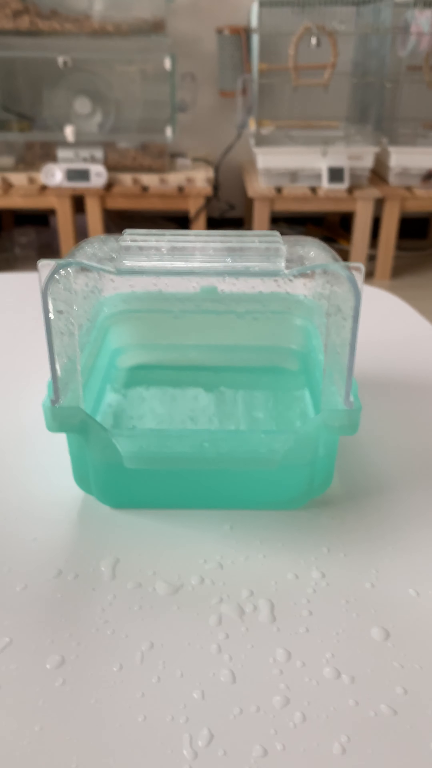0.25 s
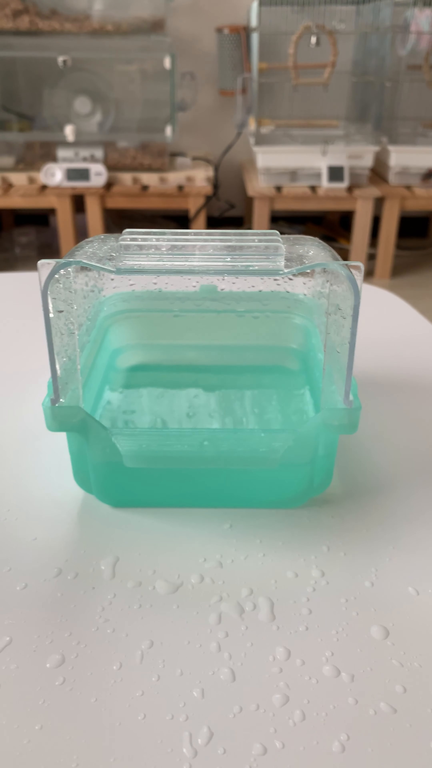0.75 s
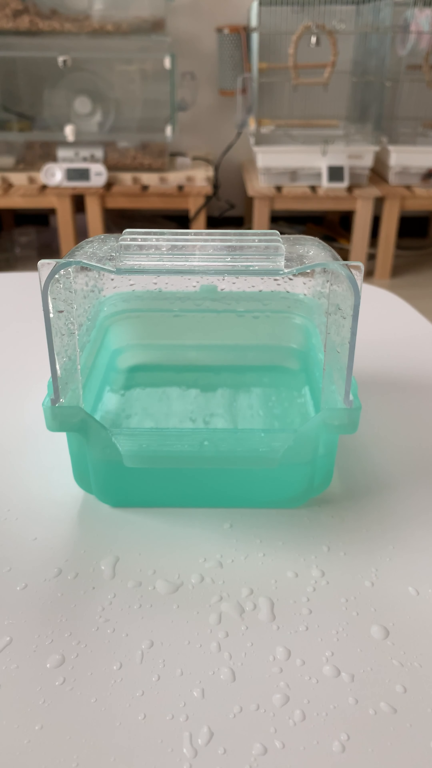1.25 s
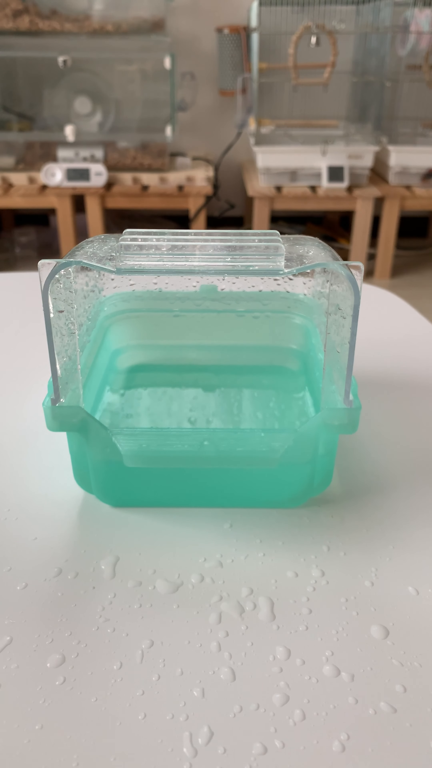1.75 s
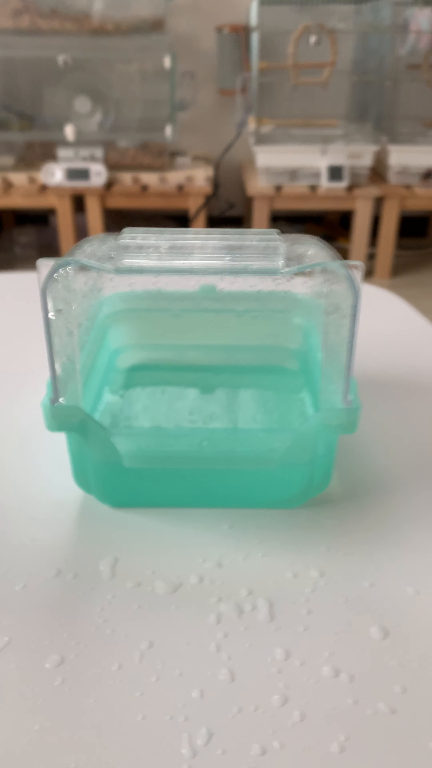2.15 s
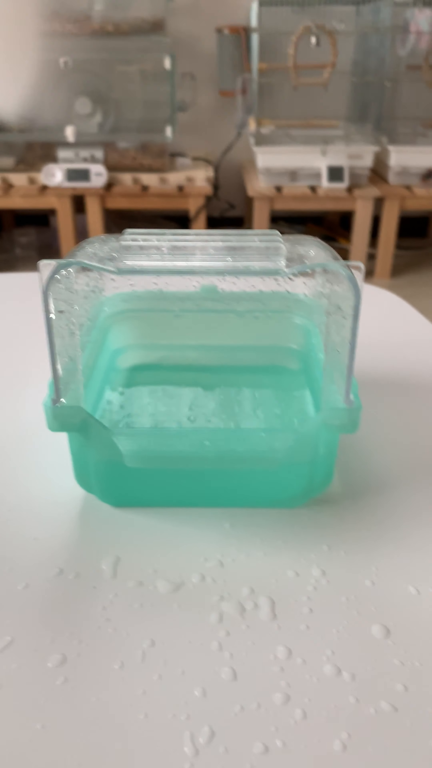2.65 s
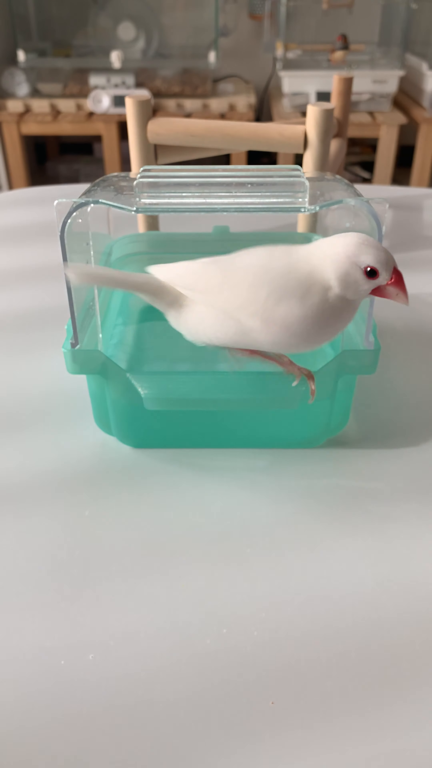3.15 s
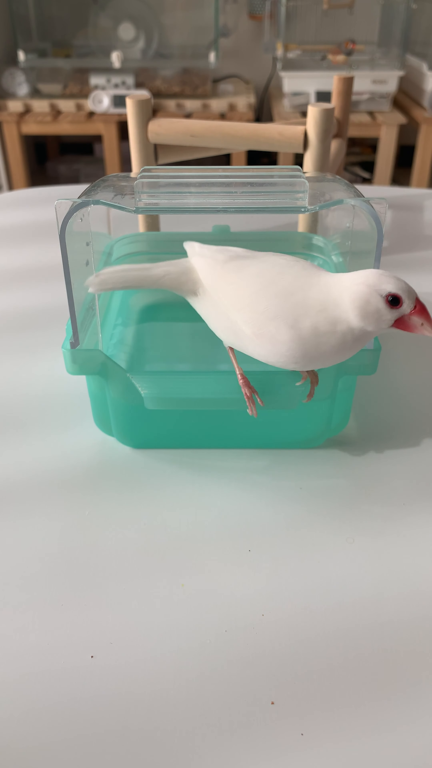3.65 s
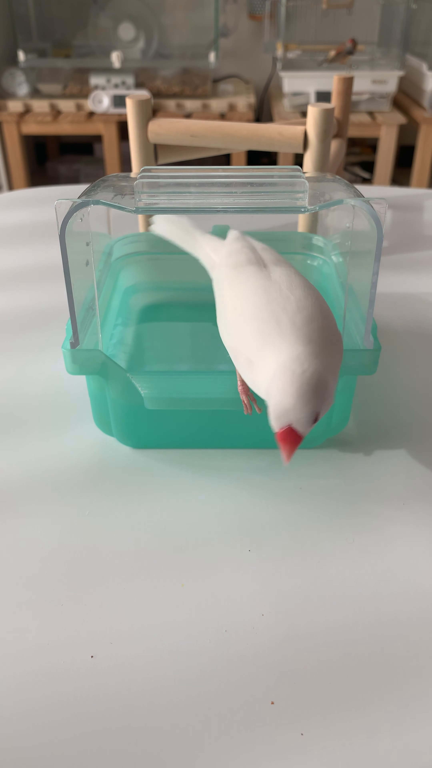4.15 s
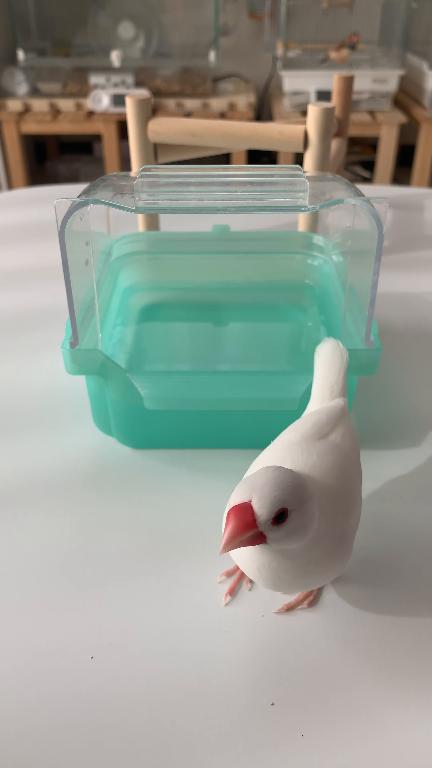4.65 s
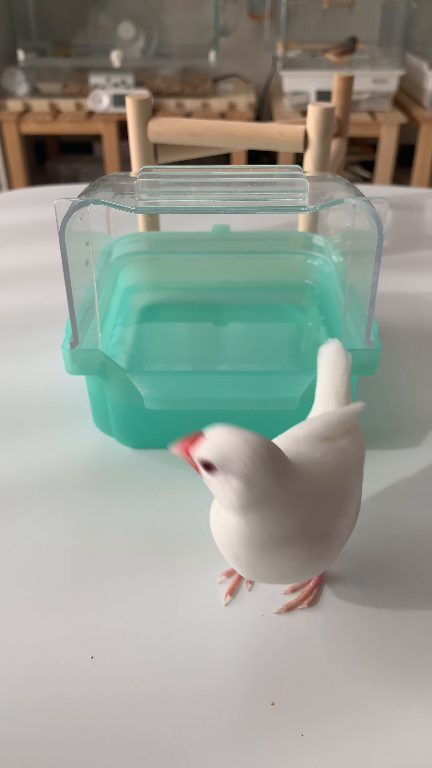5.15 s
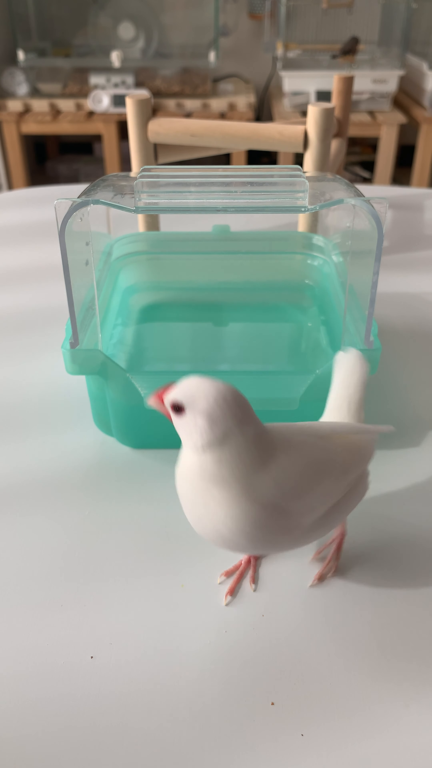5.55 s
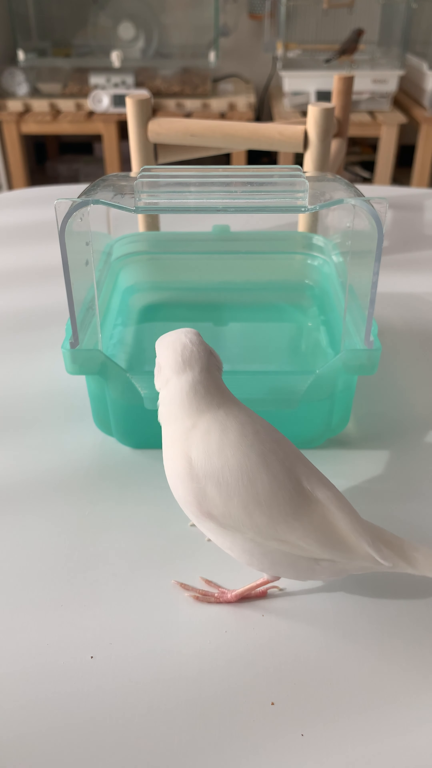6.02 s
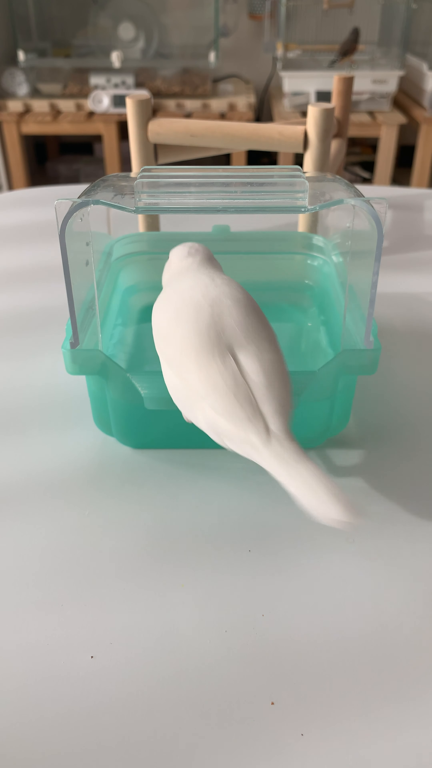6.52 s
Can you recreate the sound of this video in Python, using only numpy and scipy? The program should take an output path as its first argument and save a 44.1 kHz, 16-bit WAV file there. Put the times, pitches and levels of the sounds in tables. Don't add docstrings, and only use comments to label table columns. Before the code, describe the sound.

Soft wing flutters, sharp claw cracks and hollow plastic knocks up close, then a quieter room where a far finch sings hoarsely.

```python
import sys
import numpy as np
from scipy import signal
from scipy.fft import rfft, irfft, next_fast_len
from scipy.io import wavfile
from scipy.ndimage import uniform_filter1d

SR = 44100
rng = np.random.default_rng(int(sys.argv[2]) if len(sys.argv) > 2 else 0)


def output_pcm(signal):
    pcm = np.clip(np.atleast_2d(signal).T, -1, 1) * 32767
    wavfile.write(sys.argv[1], SR, np.round(pcm).astype(np.int16))


def invert_db(x):
    u = np.asarray(x, float) / 20
    return 10 ** u


N = 298998
CHANGE_S = 3.049


def evened(x):
    return x / np.sqrt(np.mean(x ** 2) + 1e-20)


def read(points, hz):
    f, value = np.transpose(points)
    return np.interp(np.log(hz + 1), np.log(f + 1), value)


def add(mix, s, sound):
    part = mix[max(round(s * SR), 0):][:len(sound)]
    part += sound[:len(part)]


def coloured(x, spectrum):
    n = next_fast_len(x.shape[-1])
    gain = invert_db(read(spectrum, np.fft.rfftfreq(n, 1 / SR)))
    return irfft(rfft(x, n) * gain, n)[..., :x.shape[-1]]


def swells(peak_s, peak_db, rise_db_s, fall_db_s):
    since = np.arange(0, N + 64, 64)[:, None] / SR - peak_s
    level_db = (peak_db + np.minimum(rise_db_s * since, -fall_db_s * since)).max(axis=1)
    return invert_db(np.interp(np.arange(N) / 64, np.arange(len(level_db)), level_db))


def diffuse(spectrum, likeness, patchy_db):
    frames, hz = N // 256 + 5, np.fft.rfftfreq(1024, 1 / SR)
    a, b, c, d, patches = rng.standard_normal((frames, 513, 5)).T
    patches = uniform_filter1d(patches, size=14, axis=0)
    patches = evened(uniform_filter1d(patches, size=16, axis=1))
    same = np.clip(read(likeness, hz), 0, 1)[:, None]
    left = a + 1j * b
    right = same * left + np.sqrt(1 - same ** 2) * (c + 1j * d)
    z = np.array([left, right]) * invert_db(patchy_db * patches)
    noise = signal.istft(z, nperseg=1024, noverlap=768)[1][:, :N]
    return evened(coloured(noise, spectrum))


# f/Hz, density/dB per Hz
TONE_BEFORE = [(30, -17), (60, -4.5), (100, -1), (170, -3.5), (260, 0), (390, -1.5), (520, -9), (800, -12),
               (1400, -12), (2200, -17.5), (3200, -26), (5000, -38.5), (9000, -41.5), (15500, -38)]
TONE_AFTER = [(30, -26), (60, -1.5), (100, 4), (170, -22), (260, -3.5), (390, -0.5), (520, -5.5),
              (800, -9.5), (1400, -11.5), (2200, -21), (3200, -33), (5000, -34), (9000, -38), (15500, -36)]
# f/Hz, likeness/0..1
ROOM_LIKENESS = [(60, 1), (260, 0.92), (400, 1), (560, 0.73), (800, 0.021), (3000, 0.22)]
# t/s, level/dB
NEARING = [(.6, -0.5), (1.4, -0.5), (1.7, 2), (2.0, 1.5), (2.8, -0.5)]
# f/Hz, width/Hz, level/dB
HUM = [
    (164.4, 13.6, -61.5),
    (258.3, 18, -63),
    (297.3, 21, -67.5),
    (387.4, 10, -61),
]
# t/s (peak), level/dB
STIRS = [
    (3.3, -75),
    (4.621, -64.5),
    (4.87, -66),
    (5.3, -84),
]
# f/Hz, density/dB per Hz
STIR_COLOUR = [(600, -30), (1200, -3), (2200, 0), (3200, -5), (3700, -18), (8000, -40)]


def room_tone():
    t = np.arange(N) / SR
    drone = np.zeros(N)
    for hz, width_hz, db in HUM:
        pole = np.exp(-np.pi * width_hz / SR)
        noise = rng.standard_normal(N) + 1j * rng.standard_normal(N)
        wobble = signal.lfilter([1], [1, -pole], noise)
        drone += invert_db(db) * evened((wobble * np.exp(2j * np.pi * hz * t)).real)
    before_db = -53 + np.interp(t, *np.transpose(NEARING))
    before = invert_db(before_db) * diffuse(TONE_BEFORE, ROOM_LIKENESS, patchy_db=1.5)
    after = invert_db(-58) * diffuse(TONE_AFTER, ROOM_LIKENESS, patchy_db=1.0) + drone
    stir = swells(*np.transpose(STIRS), rise_db_s=106, fall_db_s=116)
    after += stir * diffuse(STIR_COLOUR, ROOM_LIKENESS, patchy_db=1.6)
    return np.where(t < CHANGE_S, before, after)


# f/Hz, level/dB
THROAT = [(500, -39), (1100, 2), (2000, -6.5), (3500, -2.5), (5000, -5.5), (6200, -6.5), (7200, -17.5),
          (9000, -13.5), (11800, -18), (12800, -55.5)]


def syllable(length, hz, glide, db, beak_hz, rough, jitter, beak_width, count, lean=0.81, half=0.):
    n = round(length * SR)
    a, b = rng.standard_normal((2, n))
    wander = evened(uniform_filter1d(a, size=80))
    pitch_hz = hz * glide ** np.linspace(0, 1, n) * (1 + jitter * wander)
    turns = np.cumsum(pitch_hz) / SR
    tone = sum(np.cos(2 * np.pi * k * turns) for k in range(1, count + 1))
    tone = tone * (1 + half * np.cos(np.pi * turns))
    breath = b * (0.74 + np.exp(-(turns % 1) / 0.33))
    drive = (1 - rough) * evened(tone) + rough * breath
    f = np.fft.rfftfreq(n, 1 / SR)
    beak_db = -14.0 * (1 - np.exp(-(np.log((f + 1) / beak_hz) / beak_width) ** 2))
    voice = irfft(rfft(coloured(drive, THROAT)) * invert_db(beak_db), n)
    voice *= invert_db(3.5 * evened(uniform_filter1d(a[::-1], size=250)))
    envelope = np.sin(np.pi * np.linspace(0, 1, n) ** lean) ** 1.3
    return invert_db(db) * evened(voice) * envelope


# t/s, length/s, f/Hz (pitch), level/dB, f/Hz (beak)
STACKS = [
    (5.211, 0.043, 534, -64.5, 2410),
    (5.512, 0.055, 557, -50.5, 3060),
    (5.653, 0.052, 577, -49.5, 3330),
    (5.766, 0.051, 566, -51, 3000),
    (5.861, 0.071, 549, -45, 3930),
    (6.007, .04, 595.5, -42.5, 3400),
    (6.329, 0.051, 578, -45.5, 4170),
    (6.442, 0.069, 593, -44.5, 3900),
]
# t/s, length/s, f/Hz (pitch), glide/ratio, level/dB, f/Hz (beak)
CALL = (5.212, .065, 530, 1.04, -57, 2500)
# t/s, length/s, f/Hz (pitch), level/dB
DRAWLS = [
    (6.108, .15, 1141, -40.5),
    (6.562, 0.11, 1165, -39),
]
# t/s, length/s, f/Hz, glide/ratio,
# level/dB
OVERTONES = [(6.125, 0.1, 6500, .84, -46.5), (6.155, .1, 4150, 0.99, -48), (6.15, 0.12, 3600, .84, -47),
             (6.15, 0.12, 2400, .8, -54.5), (6.575, 0.098, 6300, .86, -42.5), (9.7, 0.092, 5300, 0.93, -42),
             (6.585, .12, 3600, .83, -46), (6.61, .09, 2150, .9, -52), (5.875, 0.058, 3400, 0.93, -49),
             (5.97, .03, 2100, .9, -57.5), (6.545, 0.022, 6500, 0.89, -53), (6.12, .14, 1200, .88, -51),
             (6.57, .11, 1200, .88, -51)]
# t/s, length/s, f/Hz, glide/ratio, level/dB
WHISTLES = [
    (5.945, 0.019, 5560, 0.73, -33.5),
    (5.958, 0.025, 4074, 0.99, -35),
    (6.069, 0.045, 6530, 1, -52.5),
    (6.391, 0.04, 6266, 0.81, -38.5),
    (6.4, 0.024, 4470, 0.94, -47),
    (6.406, 0.026, 4110, 0.84, -37),
    (6.52, 0.029, 6380, 0.96, -47.5),
]
# t/s, level/dB (peak), f/Hz
THROBS = [
    (5.9585, -25, 5200),
    (5.966, -37, 3930),
    (5.9724, -29, 3620),
    (5.9809, -29, 3650),
    (6.4043, -44, 6070),
    (6.4305, -41, 3730),
]


def finch():
    out = np.zeros(N)
    for s, length, hz, db, beak_hz in STACKS:
        add(out, s, syllable(length, hz, 1, db, beak_hz,
                             rough=0.71, jitter=0.03, beak_width=0.6, count=22))
    add(out, CALL[0], syllable(*CALL[1:], rough=.5, jitter=.025, beak_width=.4, count=8))
    for s, length, hz, db in DRAWLS:
        add(out, s, syllable(length, hz, .86, db, 4300, rough=.6, jitter=.04,
                             beak_width=.6, count=11, lean=1.2, half=.4))
    for s, length, hz, glide, db in OVERTONES:
        add(out, s, syllable(length, hz, glide, db, hz * np.sqrt(glide),
                             rough=.4, jitter=.035, beak_width=.2, count=1))
    for s, length, hz, glide, db in WHISTLES:
        add(out, s, syllable(length, hz, glide, db, hz * np.sqrt(glide),
                             rough=.45, jitter=.055, beak_width=.3, count=1))
    throb_s = 0.0031
    t = np.arange(0, throb_s, 1 / SR)
    for s, db, hz in THROBS:
        add(out, s, invert_db(db) * np.sin(np.pi * t / throb_s) ** 2 * np.sin(2 * np.pi * hz * t))
    return out


# f/Hz, t60/s
ROOM = [(200, 0.057), (1000, 0.32), (4000, 0.27), (10000, 0.18)]


def room(x, first):
    size = SR // 2
    taps = np.zeros((2, size))
    at = np.arange(first, size - 20, 20) + rng.integers(0, 20, (2, (size - 1 - first) // 20))
    np.put_along_axis(taps, at, rng.choice([-1., 1.], at.shape), 1)
    hz, t, z = signal.stft(taps, SR, nperseg=256)
    decay = invert_db(-60 * t / read(ROOM, hz)[:, None])
    tail = signal.istft(z * decay, SR, nperseg=256)[1]
    return signal.oaconvolve(x[None], tail / np.linalg.norm(tail[0]), axes=1)[:, :N]


# f/Hz, density/dB per Hz
BUFFET = [(20, -1), (32, -11), (55, -3.5), (100, -7), (200, -16.5), (400, -27.5), (800, -56), (1600, -52),
          (3000, -75.5)]
RUSTLE = [(300, 10), (800, 5), (1600, -1.5), (3500, -4), (5500, -2.5), (8000, -11.5), (12000, -9),
          (16000, -12)]
# f/Hz, likeness/0..1
AIR_LIKENESS = [(30, 0.67), (60, 0.9), (125, 0.99), (250, 0.94), (500, 0.74), (3000, 0.11)]
# t/s (peak), level/dB (air), level/dB (feathers)
GUSTS = [(0.0, -20, -48), (.105, -21, -50), (0.192, -16.5, -58.5), (.27, -38, -57), (0.36, -37.5, -63),
         (.508, -49, -70.5), (.786, -48.5, -76), (1.953, -37, -79), (2.02, -46.5, -74.5),
         (2.122, -27.5, -55.5), (2.2, -22.5, -51.5), (2.246, -21, -51), (2.3, -31, -59), (2.36, -37, -61),
         (2.421, -33, -59.5), (2.491, -27.5, -54.5), (2.551, -31, -60.5), (2.612, -17, -52),
         (2.683, -31, -69.5), (2.807, -35.5, -68), (2.87, -48.5, -69)]
# t/s (centre), level/dB (peak), f/Hz, cycles
BEATS = [(0.109, -11, 105, 0.63), (0.129, -12.5, 47.3, 1.03), (0.186, -12, 85, 1.),
         (0.198, -15.5, 70.3, 1.), (.214, -21, 90, .8), (0.244, -24, 93, 1.2), (0.353, -28, 59.3, 2.5),
         (0.508, -63, 59.5, 0.77), (0.798, -41, 71, 1.3), (2.268, -22.5, 56.6, 0.7),
         (2.2916, -15.5, 67, 2.16), (2.584, -13, 76, 0.77), (2.615, -10.5, 103, 1.05),
         (2.638, -14, 51.4, 0.5)]


def flutter():
    buffet = diffuse(BUFFET, AIR_LIKENESS, patchy_db=0.56)
    rustle = diffuse(RUSTLE, ROOM_LIKENESS, patchy_db=0.27)
    grain_db = 1.8 * evened(uniform_filter1d(rng.standard_normal(N), size=300))
    rustle = evened(rustle * invert_db(grain_db))
    s, air_db, feather_db = np.transpose(GUSTS)
    out = swells(s, air_db, rise_db_s=330, fall_db_s=323) * buffet
    out += swells(s, feather_db + 12.5, rise_db_s=307, fall_db_s=207) * rustle
    u = np.arange(-2000, 2000) / SR
    for s, db, hz, cycles in BEATS:
        envelope = invert_db(db) * np.exp(-(2 * u * hz / cycles) ** 2)
        packet = envelope * np.cos(2 * np.pi * hz * u * (1 - 4.6 * u))
        add(out.T, s - 2000 / SR, packet[:, None])
    return np.array([out[0], np.roll(out[1], 40)])


def ring(t, hz, t60, excess):
    turns = hz * (t + excess * 0.00057 * (1 - np.exp(-t / 0.00067)))
    return (1 - np.exp(-t / .0005)) * invert_db(-60 * t / t60) * np.sin(2 * np.pi * turns)


# f/Hz, density/dB per Hz
CLAW_HISS = [(300, -24), (1500, -11), (3000, -15), (4500, 6), (6500, -0.5), (9000, -2), (12000, 0),
             (15500, -3)]


def contacts(rows, sharpness, grit_db, snap, settle=0.24):
    t, out = np.arange(2048) / SR, np.zeros(N)
    first = snap * (np.arange(len(t)) == 24)
    for s, db, body_db, hz, length in rows:
        a, b, c = rng.standard_normal((3, len(t)))
        u = np.clip(t / max(length, .001), 0, 1)
        shape = np.sin(np.pi * u ** 0.61) ** 0.91
        shape += settle * (1 - np.exp(-t / 0.002)) * np.exp(-t / 0.0081)
        shape *= invert_db(grit_db * evened(uniform_filter1d(c, size=40)))
        hiss = evened(coloured(b + first, CLAW_HISS)) * shape
        peak = signal.iirpeak(hz, sharpness, SR)
        body = signal.lfilter(*peak, (a + first) * shape)
        body = signal.lfilter(*peak, body)
        body *= invert_db(body_db) * np.std(hiss) / np.std(body)
        add(out, s - .0006, invert_db(db - 12.0) * (hiss + body) / np.sqrt(1 + invert_db(2 * body_db)))
    return out


# t/s, level/dB (peak), length/s
SCRATCHES = [(0.098, -20.5, 0.0028), (0.209, -34, 0.0039), (0.375, -33, 0.0054), (0.504, -36, 0.0044),
             (2.572, -34, 0.015), (2.813, -37, 0.0052), (2.815, -26.5, 0.0042), (3.037, -38, 0.0081),
             (3.103, -49, 0.016), (3.127, -35, 0.0095), (3.144, -30.5, 0.0092), (3.1621, -25, 0.0038),
             (3.163, -25.5, 0.008), (3.169, -23.5, 0.0067), (3.563, -54, 0.0076), (3.677, -58.5, 0.011),
             (4.133, -43.5, 0.0063), (4.223, -31, 0.0055), (4.291, -32.5, 0.008), (4.303, -37.5, 0.025),
             (5.61, -38.5, 0.011)]
# t/s, level/dB (peak), f/Hz (body), length/s
GRIPS = [(0.471, -41, 1570, 0.0046), (0.772, -38, 1000, 0.0046), (0.7736, -40, 1030, 0.0069),
         (1.974, -36, 3200, 0.0038), (1.971, -40, 3200, 0.0035), (.01, -38, 3200, 0.044),
         (2.184, -45, 2500, 0.01), (2.214, -52, 2800, 0.0082), (2.255, -46, 2000, 0.023),
         (2.47, -43, 3000, 0.018), (0.14, -38, 2500, .012), (2.092, -48, 1570, 0.014),
         (2.116, -30.5, 2120, 0.0047), (2.24, -35.5, 2000, 0.0083), (2.657, -39.5, 1600, 0.033),
         (2.732, -49.5, 1280, 0.0058), (2.787, -42, 2800, 0.0068), (3.003, -43, 1390, 0.003),
         (3.186, -44.5, 1640, 0.057), (4.217, -36.5, 1780, 0.0077), (5.622, -48, 1110, 0.021),
         (5.644, -36, 3850, 0.01)]
# t/s, level/dB (peak), f/Hz (body)
TICKS = [(.0045, -34, 3000), (0.0212, -26, 5000), (0.029, -36, 3000), (0.063, -39, 3000),
         (.0675, -35, 2800), (.109, -35, 5500), (.12, -39, 6000), (.125, -39, 3200), (.1275, -38, 3500),
         (.1487, -29, 2500), (0.1511, -27, 2680), (0.1542, -21.5, 2830), (0.1575, -29, 2500),
         (.183, -53, 7000), (0.2065, -31, 5860), (.2511, -44.5, 6500), (.2555, -32, 5500),
         (0.2623, -29.5, 6400), (.2695, -48, 6500), (.288, -44, 6500), (0.3506, -49, 6500),
         (0.3675, -50, 7000), (0.372, -39, 4000), (0.501, -39, 4500), (0.504, -32.5, 5830),
         (0.513, -36, 3600), (3.192, -33, 9000), (2.184, -55, 6500), (2.242, -44, 3000),
         (2.434, -41.5, 7000), (2.469, -38, 6500), (2.4978, -41, 6000), (2.5043, -29, 6100),
         (2.5592, -56, 6500), (2.576, -44, 6500), (2.5823, -44, 6500), (2.6035, -51, 6500),
         (2.618, -36.5, 6500), (2.621, -45, 6500), (2.631, -28, 6500), (2.635, -28, 6000),
         (2.639, -32.5, 6030), (2.653, -39.5, 2500), (2.672, -38.5, 2480), (2.735, -54.5, 6000),
         (2.7878, -37.5, 5950), (2.8686, -73, 6000), (4.2172, -29, 6540), (1.9745, -35, 5730)]
# t/s, level/dB (peak)
DRIPS = [(0.5887, -56), (0.879, -52), (0.887, -56), (1.0091, -56), (1.129, -55), (1.142, -56), (1.249, -47),
         (1.269, -43), (1.288, -45), (1.388, -57), (1.414, -54)]
# t/s, level/dB (peak), level/dB (body re hiss), f/Hz (body), length/s
CRACKS = [(.7672, -39, 21, 2380, 0.0011), (.7916, -26.5, 16, 3240, 0.0024), (2.175, -32, 21, 1790, 0.0024),
          (2.4268, -17, 9, 2930, 0.0036), (2.803, -25, 40, 1280, 0.0044), (2.8078, -21, 20, 2500, 0.0011),
          (2.8095, -14, 8.1, 2300, 0.0016), (2.8615, -30, 2.9, 1860, 0.00095),
          (2.8645, -21.5, 22, 1870, 0.0009), (2.8686, -20, 18, 2220, 0.00147),
          (3.1715, -29, 9.8, 1940, 0.01), (3.1945, -31, 7.9, 2070, 0.0043), (4.2917, -34, 9, 5500, 0.00092),
          (4.309, -33.5, 6, 5000, 0.0011)]
# t/s, level/dB (peak), f/Hz (body), length/s
SCUFFS = [(0.092, -26, 740, 0.01), (2.427, -22, 322, 0.0087), (2.598, -29, 320, 0.024),
          (2.861, -36, 387, 0.013), (3.126, -38.5, 493, 0.023), (3.147, -33, 540, 0.024),
          (3.16, -36.5, 660, 0.048), (3.172, -44, 730, 0.03), (3.174, -34.5, 322, 0.043),
          (3.192, -48, 680, 0.01), (3.199, -45, 690, 0.041), (4.126, -42, 384, 0.047),
          (4.209, -40, 435, 0.07)]
# t/s, level/dB (peak), f/Hz, t60/s, starting
KNOCKS = [(.0965, -28, 780, 0.038, 0.23), (.175, -36, 920, 0.023, 1), (.1778, -17.5, 224, 0.024, 4),
          (4.126, -42, 390, .04, .1), (4.1375, -40.5, 374, 0.054, .1), (4.2175, -36, 800, .015, .8),
          (3.174, -49, 1820, 0.044, .1), (0.5055, -25, 253, 0.015, 1.35), (0.794, -24, 139, 0.0055, 1.4),
          (2.1755, -21, 465, 0.021, 3.7), (2.422, -35, 805, 0.072, 0.041), (2.725, -44, 734, 0.072, 0.09),
          (3.197, -31, 716, 0.039, 0.14), (6.484, -39.5, 650, 0.022, .1), (6.513, -29, 722, 0.067, 0.022),
          (6.523, -24.5, 647, 0.0091, 0.033),
          (.7668, -21.5, 764, 0.0089, .2), (.7913, -18, 700, 0.012, 1.86),
            (2.8093, -12, 660, 0.019, 3.54), (2.8135, -25, 200, 0.0095, 0.42),
            (2.8108, -20, 417, 0.011, 0.83), (2.4272, -26, 2000, 0.012, .2),
            (2.8094, -21, 2100, 0.0049, 0.45), (2.8605, -28, 1100, 0.013, .5),
            (2.8625, -25, 2050, 0.011, 0.24), (2.8635, -22, 784, 0.011, .3),
            (2.8684, -27, 694, 0.011, 1.35)]
# t/s, level/dB (peak), f/Hz, t60/s
DROPS = [(.061, -41, 1070, .02), (.0765, -39, 1990, .02), (.0865, -37.5, 2040, .04),
         (.108, -34, 3570, 0.011), (.1295, -41, 3100, 0.016), (0.145, -31, 2960, .012),
         (0.2014, -41, 1400, 0.015), (0.2548, -38.5, 1300, 0.017), (0.261, -44, 1270, 0.017),
         (0.2676, -34, 1340, 0.014), (0.275, -39, 1460, 0.016), (.2812, -44, 5900, .015),
         (.289, -44, 4090, 0.02), (0.29, -42, 1470, 0.014), (.3348, -37, 2150, 0.0081),
         (.3568, -41.5, 2040, 0.022), (0.433, -51, 1570, 0.024), (1.9312, -52, 1350, 0.023),
         (2.151, -43, 1000, 0.028), (2.19, -52, 1620, 0.018)]


def claws():
    rubs = [(s, db, -13, 1250, length) for s, db, length in SCRATCHES]
    rubs += [(s, db, 6, hz, length) for s, db, hz, length in GRIPS]
    ticks = [(s, db, 3, hz, .0018) for s, db, hz in TICKS]
    drips = [(s, db + 4, 28, 3300, .0015) for s, db in DRIPS]
    scuffs = [(s, db, 17.5, hz, length) for s, db, hz, length in SCUFFS]
    out = contacts(rubs, sharpness=0.46, grit_db=6.0, snap=0.5)
    out += contacts(ticks, sharpness=1.0, grit_db=2.2, snap=7.6, settle=0.064)
    out += contacts(drips, sharpness=1.1, grit_db=2.5, snap=9.0, settle=.05)
    out += contacts(CRACKS, sharpness=.75, grit_db=1.5, snap=9.0)
    out += contacts(scuffs, sharpness=1.7, grit_db=5.8, snap=0.47)
    t = np.arange(4000) / SR
    for s, db, hz, t60, excess in [*KNOCKS, *[(*row, 0) for row in DROPS]]:
        add(out, s, invert_db(db + 2.5) * ring(t, hz, t60, excess))
    return out


# f/Hz, level/dB
SOFT_EDGE = [(15750, 0), (16000, -40)]


def alike(x):
    n = next_fast_len(N)
    hz = np.fft.rfftfreq(n, 1 / SR)
    left, right = rfft(x, n) * invert_db(read(SOFT_EDGE, hz))
    mono = 1 / (1 + (3700 / (hz + 1)) ** 10)
    return irfft(np.array([left, mono * left + (1 - mono) * right]), n)[:, :N]


# f/Hz, level/dB
SCATTER_EDGE = [(6000, 0), (7500, -25)]


def scene():
    near, far = claws(), finch()
    tail = room(far, first=100)
    song = invert_db(-0.5) * far + invert_db(-1.5) * tail
    bounce = coloured(near, [(1200, -30), (3000, 0)])
    bounce *= np.where(np.arange(N) < CHANGE_S * SR, 1, .35)
    close = near + 0.43 * np.array([np.roll(bounce, 27), -np.roll(bounce, 17)])
    spread = alike(room_tone() + flutter() + invert_db(-22.0) * room(near, first=200) + song)
    late = coloured(np.roll(tail[1], 500), SCATTER_EDGE)
    scatter = invert_db(-9) * late * [[1], [-1]]
    return spread + close + scatter


def roll_off(x):
    return signal.sosfilt(signal.butter(12, 16810, fs=SR, output="sos"), x)


# f/Hz, level/dB
BAND = [(12, -40), (24, -16), (36, -1), (50, 0), (15800, 0), (16000, -6), (16700, -10), (16850, -60)]
# f/Hz, phase/rad
PORT_LEAD = [(100, 0), (300, -.5), (600, -1.3), (1200, -1.2), (2500, 1.5), (3500, 1.8)]


def record(dry):
    from_change_s = abs(np.arange(N) / SR - CHANGE_S)
    gap = np.clip((from_change_s - .0055 / 2) / .003, 0, 1)
    n = next_fast_len(N + SR // 10)
    hz = np.fft.rfftfreq(n, 1 / SR)
    left, right = rfft(dry * gap, n) * invert_db(read(BAND, hz))
    delay_rad = np.where(hz > 3500, 2 * np.pi * (hz - 2680) / 4220, -9)
    right = right * np.exp(-1j * np.maximum(read(PORT_LEAD, hz), delay_rad))
    mix = irfft(np.array([left, right]), n)[:, :N]
    return roll_off(mix)


dry = scene()
out = record(dry)
output_pcm(out)
```